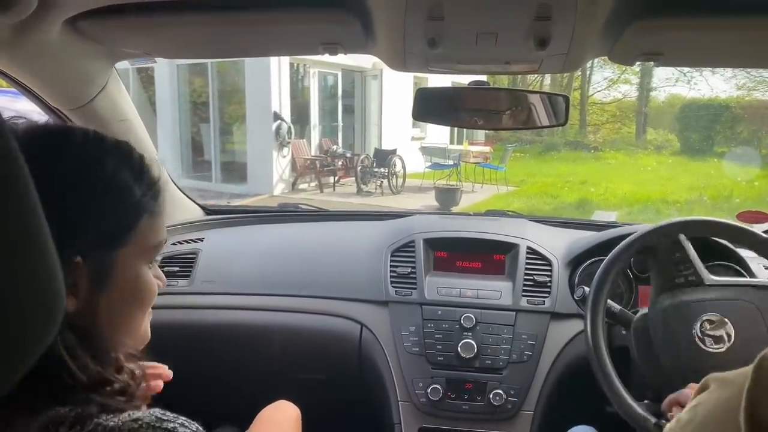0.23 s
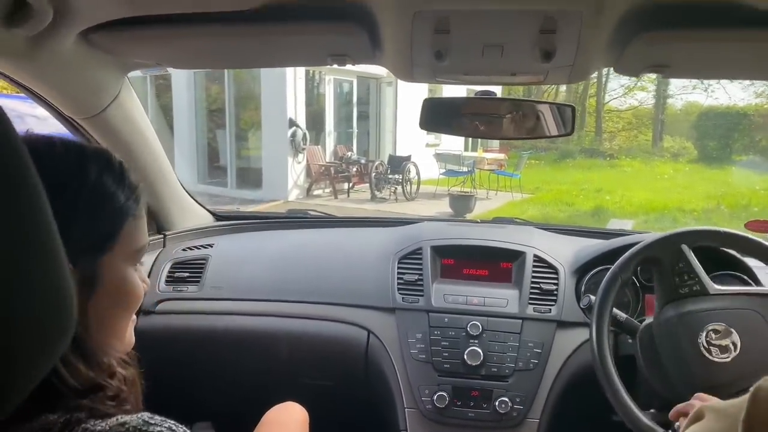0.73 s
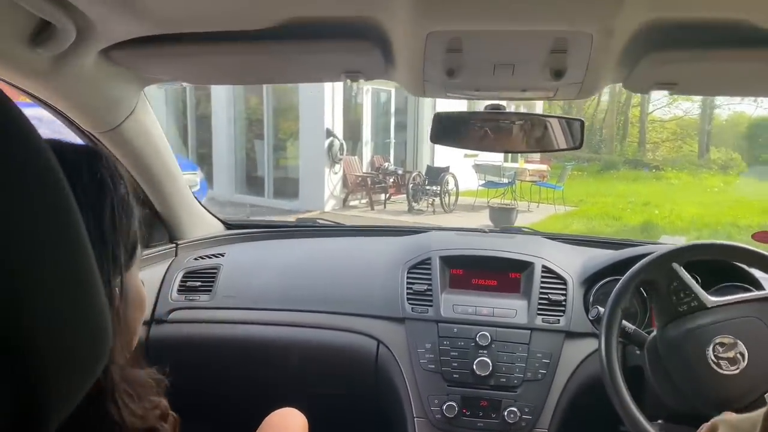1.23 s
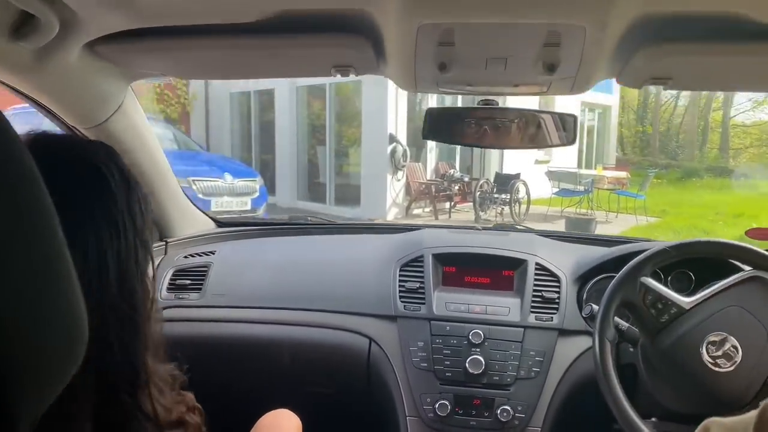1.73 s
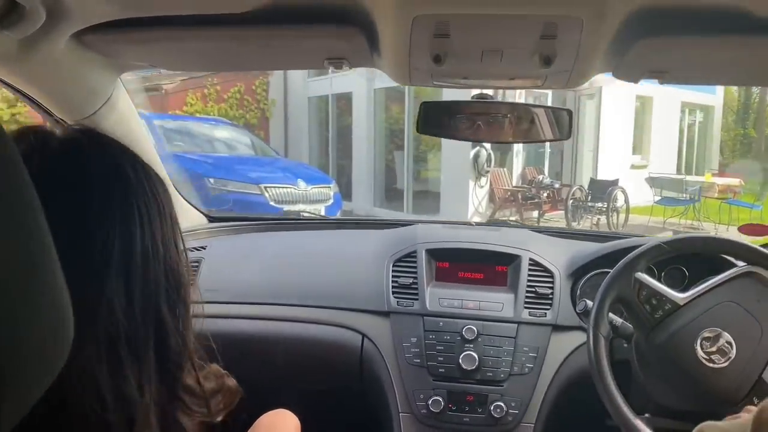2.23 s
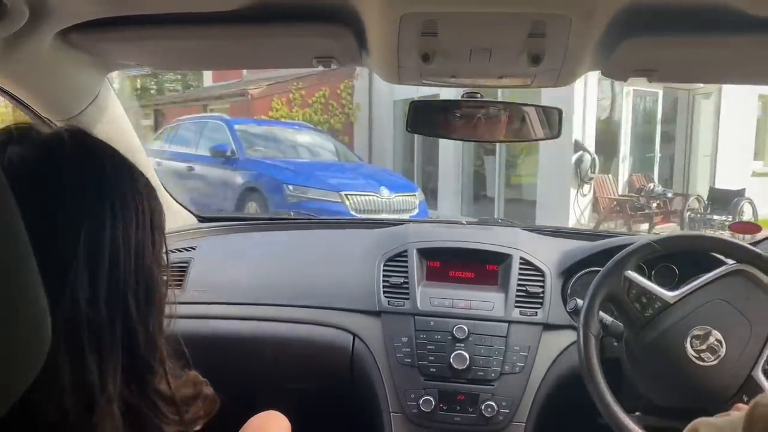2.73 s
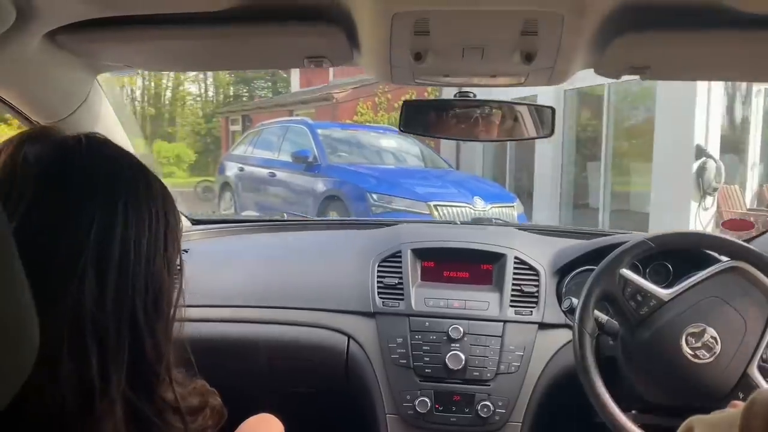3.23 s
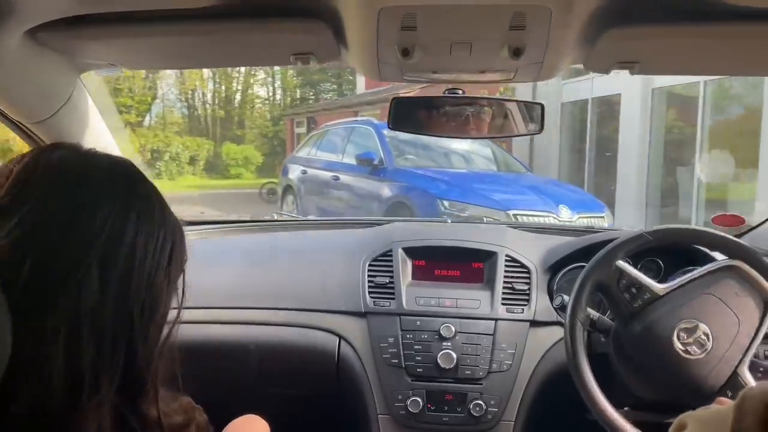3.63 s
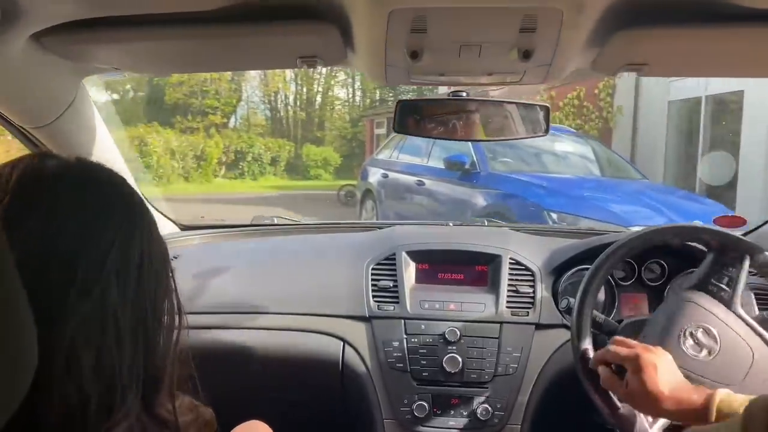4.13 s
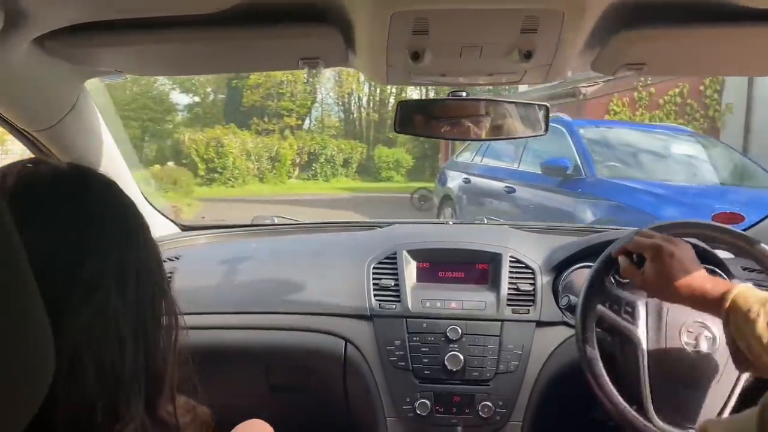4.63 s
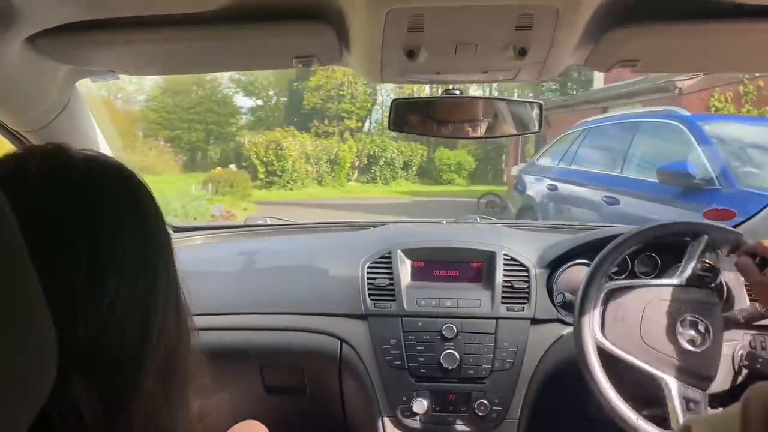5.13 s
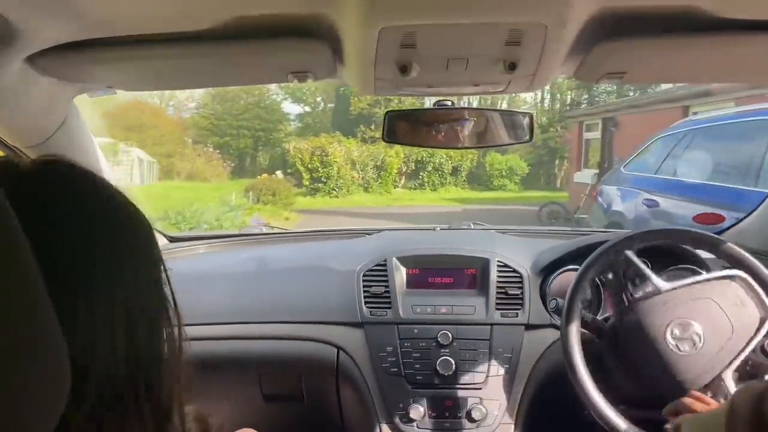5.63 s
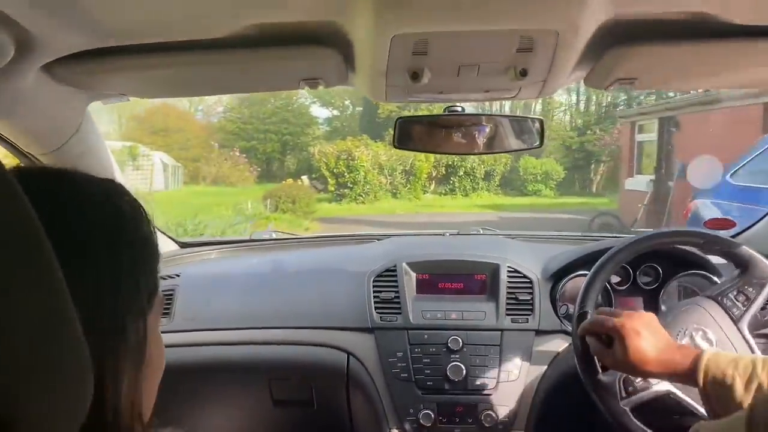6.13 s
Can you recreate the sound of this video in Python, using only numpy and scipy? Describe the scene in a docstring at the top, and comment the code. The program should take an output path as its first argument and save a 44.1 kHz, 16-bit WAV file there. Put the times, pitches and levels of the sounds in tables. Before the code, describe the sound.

From the back seat of a slow car, a diesel engine drones and rattles over a low road rumble and a faint blower hum. A gear lever thumps into place early on, with soft clothing rustle, small clicks and a slight clutch rasp. The engine swells briefly, sinks to an uneven knock, then speeds up and clatters louder as the car pulls away with faintly hissing tyres.

```python
"""Inside a small diesel car, microphone on the back seat, creeping across a yard and then pulling away.
The firing tones boom all round the cabin; combustion clatter rings the trim and engine covers, one
cylinder knocking harder than the rest, and the road shakes the panels. Up front the blower runs, the gear
lever thumps home and the clutch rasps. Close by, cloth rustles and trim ticks; the tyres hiss louder
as the car speeds up."""
import sys
import numpy as np
from scipy import signal
from scipy.fft import rfft, irfft
from scipy.io import wavfile
from scipy.ndimage import uniform_filter1d

SR = 44100
rng = np.random.default_rng(int(sys.argv[2]) if len(sys.argv) > 2 else 0)


def pcm_store(signal):
    """Save signal as 16-bit PCM."""
    levels = np.round(np.clip(np.atleast_2d(signal), -1, 1) * 32767)
    wavfile.write(sys.argv[1], SR, levels.astype(np.int16).T)


N = 281358
T = np.arange(N) / SR
BIN_HZ = np.maximum(np.arange(N // 2 + 1) * SR / N, 1)

# How the engine is driven. Each row: time in seconds, firing rate in Hz, effort in dB.
ENGINE = [(0.0, 30.19, -5), (0.43, 26.29, -6.5), (0.46, 26.75, -4.5), (0.64, 31.13, 1), (0.74, 34.44, -0.5),
          (0.92, 37.16, -5.5), (1.04, 36.84, -5.5), (1.35, 35.98, -3), (1.65, 33.56, -6), (1.97, 31.6, 1.5),
          (2.31, 29.89, -6.5), (2.59, 28.97, -7.5), (2.85, 28.61, -7.5), (3.14, 28.5, -6),
          (3.51, 28.56, -5.5), (3.62, 29.1, -2), (3.76, 30.36, -3), (4.04, 30.24, -4), (4.43, 36.02, -1),
          (4.52, 37.82, -11), (4.7, 38.75, -0.5), (5.14, 38.86, -2), (5.71, 44.0, 1.5), (5.98, 47.58, 1),
          (6.26, 52.3, -1), (6.37, 53.84, -5)]
# Engine load, heard as clatter in the trim. Each row: time in seconds, level in dB.
LOAD = [(0.4, -52), (0.7, -49.5), (1.5, -51), (2.6, -52), (3.9, -52), (4.35, -50), (5.0, -49.5),
        (5.66, -47), (6.2, -41.5)]


def undb(db):
    """Decibels to gain."""
    return 10 ** (np.asarray(db, float) / 20)


def pan(left_minus_right_db):
    """Gains for the left and right sides of the microphone."""
    return undb(np.array([[left_minus_right_db], [-left_minus_right_db]]) / 2)


def curves(table):
    """The columns after a table's first, time in seconds, interpolated at every sample."""
    times, *columns = np.transpose(table)
    return [np.interp(T, times, column) for column in columns]


def colour(points):
    """Gain at every frequency, from points of frequency in Hz and level in dB."""
    hz, db = np.transpose(points)
    return undb(np.interp(np.log(BIN_HZ), np.log(hz), db))


def rolloff(hz, power=4):
    """Gain that falls away above hz, or below it for a negative power."""
    return 1 / (1 + (BIN_HZ / hz) ** power)


def resonances(modes):
    """Summed response of damped resonators, alternating in sign."""
    return sum((-1) ** k * undb(db) / (1 + 1j * (BIN_HZ - hz ** 2 / BIN_HZ) / width)
               for k, (hz, width, db) in enumerate(modes))


def wander(rate_hz):
    """Random steps smoothed twice, with a spread near 1."""
    hold = int(SR / rate_hz)
    steps = np.repeat(rng.standard_normal(N // hold + 1), hold)
    return 1.3 * uniform_filter1d(uniform_filter1d(steps, hold), hold)[:N]


def grainy(jump_db, grain_s):
    """Two noises whose strength jumps together in short grains."""
    hold = int(grain_s * SR)
    jumps = np.repeat(rng.exponential(size=N // hold + 1), hold)[:N]
    return undb(jump_db * jumps) * rng.standard_normal((2, N))


def diffuse(drive, response, band_hz):
    """Two drives coloured as mid and side, returned as left and right; the mid has rms 1 in the band."""
    # Stereo width at the back seat. Each row: frequency in Hz, side minus mid in dB.
    side_db = [(60, -28.5), (110, -9.5), (200, -9), (380, -14), (700, -2.5), (1290, 5.5), (2380, -0.5),
               (4400, -0.5), (8120, 1), (15000, -5)]
    mid, side = rfft(drive) * response
    band = (BIN_HZ > band_hz[0]) & (BIN_HZ < band_hz[1])
    band_rms = np.sqrt(2 * np.sum(abs(mid[band]) ** 2)) / N
    mid, side = irfft(np.array([mid, side * colour(side_db)]) / band_rms, N)
    return np.array([mid + side, mid - side])


def tone(hz, db, waver_db):
    """A sine whose rms level wavers around db."""
    return np.sqrt(2) * undb(db + waver_db * wander(10)) * np.sin(2 * np.pi * np.cumsum(hz) / SR)


def engine_boom():
    """The first three firing tones, each as loud as the cabin lets its pitch be."""
    # Strength of each tone at the engine mounts in dB, lowest first.
    mounts_db = [3.5, -11.5, -15]
    # How the cabin booms. Each row: frequency in Hz, gain in dB.
    cabin = [(27, -33), (30, -35), (34, -32), (36, -34), (37.4, -46), (39, -39.5), (42, -32.5), (46, -31.5),
             (52, -20.5), (57, -11), (61, -26.5), (68, -25.5), (77, -20), (86, -18), (98, -21), (108, -31),
             (150, -25)]
    cabin_hz, cabin_db = np.transpose(cabin)
    hz, effort_db = curves(ENGINE)
    return sum(tone(k * hz, db + effort_db + np.interp(k * hz, cabin_hz, cabin_db), waver_db=0.9)
               for k, db in enumerate(mounts_db, start=1))


def engine_whines(half_width_hz=28):
    """High multiples of the firing rate sing out while they lie on a cabin resonance."""
    # Each row: multiple of the firing rate, resonance in Hz, relative level in dB.
    whines = [(9, 472, 0), (10, 480, 1), (11, 478, -3), (12, 488, -1), (13, 478, -5), (14, 505, -1),
              (15, 482, 1), (16, 488, -2), (17, 485, -8), (11, 585, -2), (11.5, 590, 0), (12, 590, -2),
              (16.5, 637, -2), (14, 700, -4)]
    hz, level_db = curves(ENGINE)[0], curves(LOAD)[0] - 1
    return sum(tone(multiple * hz, level_db + db, waver_db=-2.5)
               / (1 + ((multiple * hz - centre_hz) / half_width_hz) ** 4)
               for multiple, centre_hz, db in whines)


def combustion(firing_hz):
    """Four cylinders fire in turn, each giving a knock and a dying rattle; both as mid and side drives."""
    # Unevenness of the four cylinders in dB, the hard one first.
    cylinders_db = [0, -3.5, -4, -5]
    # Moments in seconds that pin the hard cylinder's beat.
    hard_s = [.522, .653, .773, 1.103, 1.43, 2.165, 2.297, 2.569, 2.847, 3.127, 3.409, 3.549, 3.814, 4.206,
              4.542, 5.166, 5.458, 5.736, 5.912]
    count = np.cumsum(firing_hz) / SR
    count -= count[int(hard_s[0] * SR)]
    at_hard = np.interp(hard_s, T, count)
    in_step = 4 * np.cumsum(np.round(np.diff(at_hard, prepend=0) / 4))  # whole rounds of four firings
    count += np.interp(T, hard_s, in_step - at_hard)
    count += 400 - 0.04  # stays positive; the ring needs a moment to arrive
    firing = count.astype(int)
    uneven = np.clip(34 / firing_hz, 0, 1) ** 2  # above 34 Hz the cylinders even out and knock less
    scatter_db = 0.5 * rng.standard_normal(firing[-1] + 1)
    strength = undb(uneven * np.array(cylinders_db)[firing % 4] + scatter_db[firing])
    knock = uneven * strength ** 2 * np.diff(firing, prepend=firing[0])
    knock = np.array([knock, np.roll(knock, 90)])  # the side path is a little longer
    burst = 0.53 + np.exp(-(count % 1) / 0.75)
    rattle = strength ** 0.6 * burst * rng.standard_normal((2, N))
    return knock, rattle


def engine_clatter():
    """Rattle rings the cabin trim, knocks ring the engine block, and both ring the thin engine covers."""
    # Resonances of the three parts. Each row: frequency in Hz, width in Hz, relative level in dB.
    trim_modes = [(308.8, 16, 2.5), (385, 40, -5), (477.4, 40, -3.5), (585.2, 27.4, -2), (641, 22, -0.5),
                  (793, 120, -7)]
    block_modes = [(588, 13, 3), (640, 18, -2), (790, 50, -12), (1030, 70, -11), (3350, 50, -24)]
    cover_modes = [(1013.7, 30, 7), (1095, 43, 1), (1159, 46.5, 0.5), (1406, 230, -9), (1650, 116, -8),
                   (1841, 72, -6), (2033, 180, -12.5), (2506, 250, -14.5), (3364, 8.7, -17.5)]
    firing_hz = curves(ENGINE)[0]
    knock, rattle = combustion(firing_hz)
    buzz = rattle + undb(24.5) * knock + 0.7 * rng.standard_normal((2, N))  # also buzzes between firings
    trim = diffuse(rattle, resonances(trim_modes) * rolloff(1000), band_hz=(420, 900))
    block = diffuse(knock, resonances(block_modes) * rolloff(480, -8) * rolloff(4000), (420, 900))
    covers = diffuse(buzz, resonances(cover_modes) * rolloff(800, -4) * rolloff(5500), (950, 2800))
    covers_db = -7 + 5 * np.log2(firing_hz / 30)  # 5 dB more per octave of engine speed
    return undb(curves(LOAD)[0]) * (undb(-2) * trim + undb(-5) * block + undb(covers_db) * covers)


def panel_rumble(load_share=0.24):
    """Road and mount vibration rings the body panels, following a share of the swing in load."""
    # Panel resonances. Each row: frequency in Hz, width in Hz, relative level in dB.
    panels = [(38.3, 14, 4.5), (79.9, 17.1, 10.5), (111.3, 17.7, 4), (150, 28.2, 0), (196, 35.4, -1.5),
              (277, 113, -6.5)]
    shaking = undb(0.66 * wander(9.8)) * rng.standard_normal((2, N))
    load_db = curves(LOAD)[0]
    level_db = -41.5 + load_share * (load_db - load_db.mean())
    return undb(level_db) * diffuse(shaking, resonances(panels) * rolloff(330), band_hz=(108.8, 280))


def blower():
    """The blower motor holds one faint pitch."""
    return tone(hz=np.full(N, 304.9), db=-50.5, waver_db=1.8)


def vent_air():
    """Air from the vents hisses faintly, its level wavering."""
    # Colour of the air. Each row: frequency in Hz, relative level in dB.
    spectrum = [(2000, -30), (2900, -4), (4100, -6), (6000, -9), (7200, -19), (10000, -27), (11700, -34),
                (15000, -46)]
    level_db = -79 + wander(8.9)
    return undb(level_db) * diffuse(grainy(0.88, 0.0061), colour(spectrum), band_hz=(5350, 15000))


def cloth_rustle(rise_s=0.17):
    """Sleeves and seat cloth rub as people move; rise and fall times are for 20 dB."""
    # Each row: time of the peak in seconds, level in dB, fall in seconds.
    moves = [(0.0, -60.5, .6), (0.354, -61.5, .07), (0.684, -63, .4), (1.5, -62, .3)]
    # Colour of the cloth. Each row: frequency in Hz, relative level in dB.
    spectrum = [(880, -9), (1500, -6.5), (2360, -16.5), (3600, -15.5), (5500, -17), (7500, -19),
                (9820, -16), (11200, -15.5), (12100, -44.5), (13100, -18.5), (15000, -37)]
    rubbing = sum(undb(db - 20 * np.maximum((peak_s - T) / rise_s, (T - peak_s) / fall_s))
                  for peak_s, db, fall_s in moves)
    return rubbing * diffuse(grainy(0.63, 0.0058), colour(spectrum), band_hz=(2600, 10000))


def trim_ticks(t60_s=0.035, attack_s=0.00061, alike=0.7):
    """Trim and switches give short noisy snaps, largely alike on both sides of the microphone."""
    # Each row: start in seconds, peak in dB before panning, pitch in Hz, left minus right in dB.
    ticks = [(0.084, -41, 1530, -4), (0.314, -46, 2000, 1), (0.342, -37.5, 2150, -1), (0.343, -45, 4900, 6),
             (0.352, -44, 5000, 6), (0.362, -44, 5100, 10), (.379, -31.5, 514, 2), (.512, -50, 2600, 3),
             (0.525, -36, 1060, 2), (0.551, -48, 9000, 3), (.688, -43, 3018, 8), (0.816, -45, 3600, 7),
             (0.898, -46, 4453, 4), (0.966, -48, 4970, 5), (1.049, -44, 2500, 6), (1.063, -55, 5500, 1),
             (1.1045, -28, 600, 4), (1.104, -41, 1200, 6), (1.105, -43, 1860, 2), (1.106, -56, 3800, 1),
             (1.752, -50, 2318, 8), (2.232, -46.5, 6000, 2), (2.3, -51, 5200, 2), (2.451, -55, 5500, 5),
             (4.527, -62, 6000, 2), (5.656, -46, 5100, -4)]
    out, t = np.zeros((2, N + SR)), np.arange(4096) / SR
    envelope = np.minimum(t / attack_s, 1) * undb(-60 * t / t60_s)
    for start_s, db, hz, pan_db in ticks:
        noise = rng.standard_normal((2, len(t)))
        noise = alike * noise[0] + (1 - alike) * noise
        noise[:, 40] += 25  # the first contact
        band = signal.butter(2, [hz / 1.25, min(hz * 1.5, 14000)], "bandpass", fs=SR, output="sos")
        snap = signal.sosfilt(band, noise * envelope)
        start = int(start_s * SR)
        out[:, start:start + len(t)] += undb(db) * pan(pan_db) * snap / abs(snap).max()
    return out[:, :N]


def gear_lever(contact_s=0.0023, left_lag_s=0.0006):
    """Blows ring the gear linkage through a padded contact, a little right of the microphone."""
    # Each row: start in seconds, peak in dB before the padding, gain of the upper modes in dB.
    blows = [(0.34, -13.5, -22), (0.379, -15.5, -16), (.386, -4.5, 12), (.408, -15.5, 0),
             (0.423, -11.5, 5.5), (0.527, -28, -35)]
    # Modes of the linkage. Each row: frequency in Hz, level in dB, seconds to fall 60 dB.
    linkage = [(81.1, 15, 0.254), (155.5, 10, 0.1), (194, -2, 0.15), (306.7, -2.5, 0.2), (455, -5, 0.032),
               (502, -5, 0.051)]
    out, t = np.zeros(N + SR), np.arange(SR // 2) / SR
    for start_s, db, upper_db in blows:
        ring = sum(undb(mode_db + upper_db * (k > 0) - 60 * t / t60_s) * np.sin(2 * np.pi * hz * t)
                   for k, (hz, mode_db, t60_s) in enumerate(linkage))
        start = int(start_s * SR)
        out[start:start + len(t)] += undb(db) * ring / abs(ring).max()
    padding = np.hanning(int(contact_s * SR))
    thump = np.convolve(out, padding / padding.sum())[:N]
    return pan(-1) * np.array([np.interp(T - left_lag_s, T, thump), thump])


def clutch_rasp():
    """The clutch plate slips in short grains as the car takes up drive."""
    # Strength of the rasp. Each row: time in seconds, level in dB.
    slip = [(.45, -71), (.6, -60.5), (.85, -61), (1.15, -65.5), (1.5, -65), (1.75, -68.5), (2.1, -78)]
    # What the slipping rings. Each row: frequency in Hz, width in Hz, relative level in dB.
    modes = [(1700, 110, 0), (1940, 95, 5), (2750, 140, -5.5)]
    response = resonances(modes) * rolloff(1400, -4) * rolloff(3300)
    return undb(curves(slip)[0]) * diffuse(grainy(1.5, 0.0063), response, band_hz=(1500, 3200))


def hums(fade_s=0.08):
    """Two faint hums, near 80 and 200 Hz, fade in, waver and fade out."""
    # Each row: time in seconds, pitch in Hz, level in dB.
    low_hum = [(.55, 82, -37), (.95, 82, -44), (1.4, 83, -38), (1.75, 81, -38), (2.2, 79, -35),
               (2.6, 76.5, -36), (3.2, 75.5, -34), (3.7, 78, -34), (4.1, 79, -38), (4.45, 80, -38)]
    high_hum = [(2.15, 206, -46.5), (2.5, 198.8, -43), (2.9, 195.8, -44), (3.3, 194.4, -45.5),
                (3.6, 195.1, -46.5)]
    out = np.zeros(N)
    for hum in (low_hum, high_hum):
        hz, db = curves(hum)
        fade = np.clip(np.minimum(T - hum[0][0], hum[-1][0] - T) / fade_s, 0, 1)
        out += fade * tone(hz, db, waver_db=2.5)
    return out


def tyre_hiss(pull_away_s=4.18, rise_db_per_s=14.5):
    """The tyres outside give a grainy hiss that climbs steadily as the car pulls away."""
    # Colour of the tyres. Each row: frequency in Hz, relative level in dB.
    spectrum = [(1650, -44), (2250, -14.5), (2550, 10.5), (2950, -5.5), (3430, 1), (8140, -9), (9910, -8),
                (11300, -8), (12000, -26), (13000, -18.5), (15000, -18.5)]
    level_db = -86 + rise_db_per_s * (T - pull_away_s)
    return undb(level_db) * diffuse(grainy(1.8, 0.0026), colour(spectrum), band_hz=(2740, 10000))


def scene(right_lag_samples=22):
    """The cabin from the back seat: tones and noise lean left, and the tones reach the left first."""
    tones = blower() + engine_boom() + hums() + engine_whines()
    tones = np.array([tones, np.append(np.zeros(right_lag_samples), tones)[:N]])
    noises = engine_clatter() + clutch_rasp() + panel_rumble() + vent_air() + tyre_hiss() + cloth_rustle()
    return pan(0.7) * (tones + noises) + trim_ticks() + gear_lever()


def record(dry):
    """The microphone drops the deepest bass and cuts the top steeply."""
    low_cut = signal.butter(2, 16, "highpass", fs=SR, output="sos")
    top_cut = signal.ellip(8, 0.2, 70, 15200, fs=SR, output="sos")
    return signal.sosfilt(top_cut, signal.sosfilt(low_cut, dry))


dry = scene()
out = record(dry)
pcm_store(out)
```